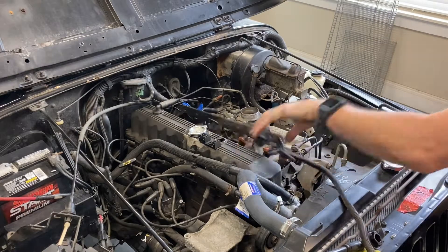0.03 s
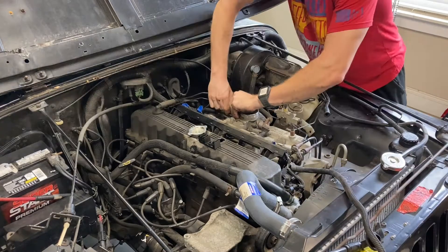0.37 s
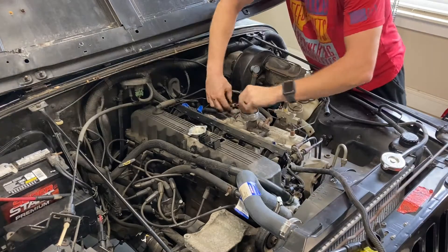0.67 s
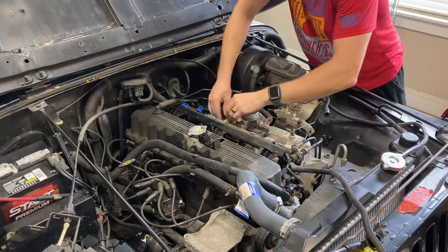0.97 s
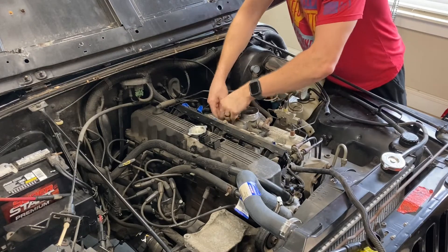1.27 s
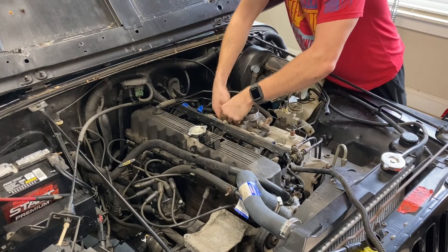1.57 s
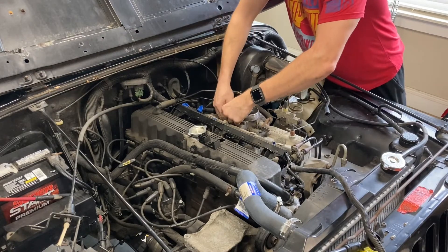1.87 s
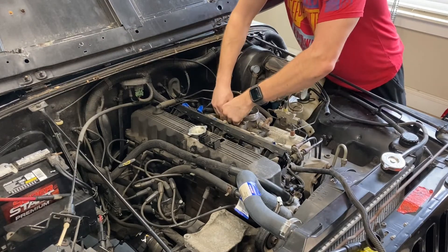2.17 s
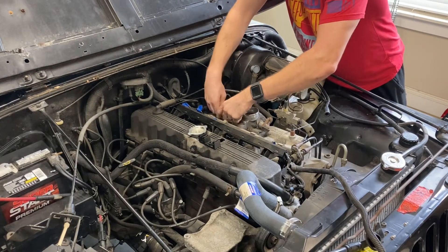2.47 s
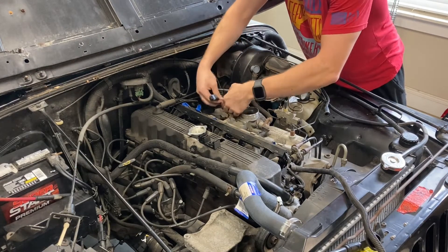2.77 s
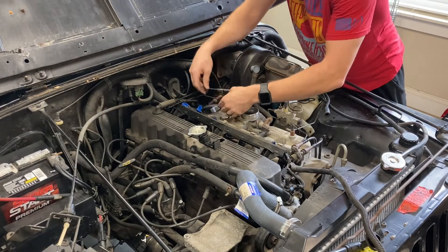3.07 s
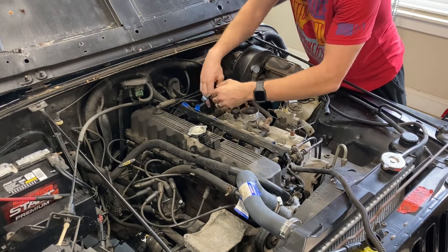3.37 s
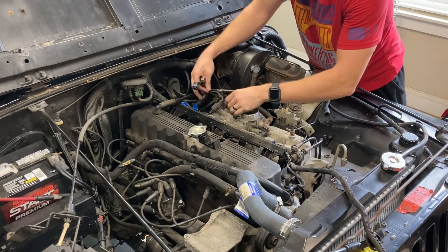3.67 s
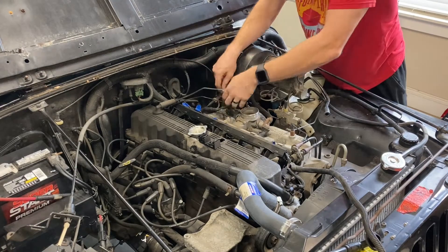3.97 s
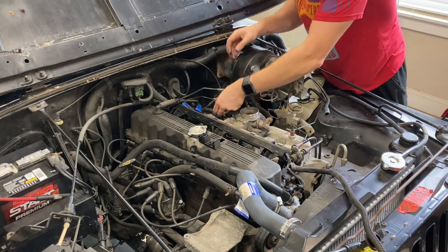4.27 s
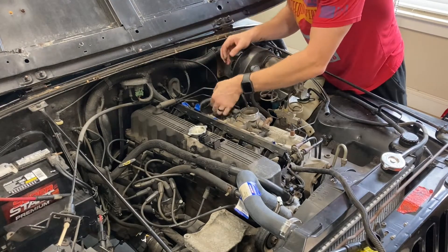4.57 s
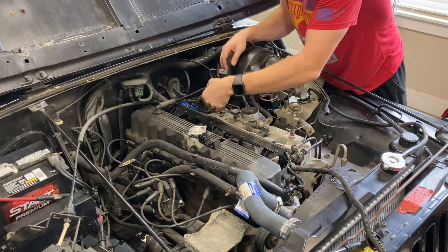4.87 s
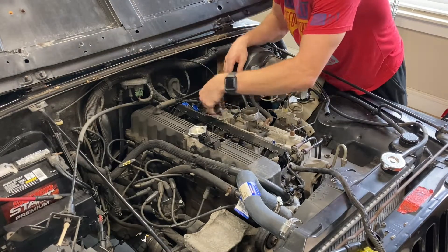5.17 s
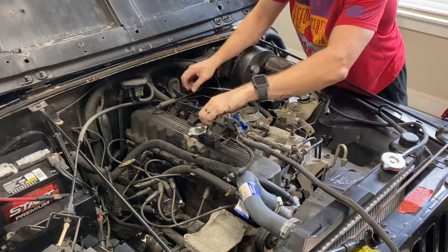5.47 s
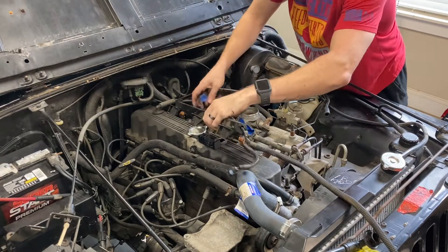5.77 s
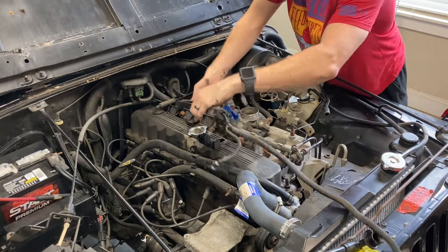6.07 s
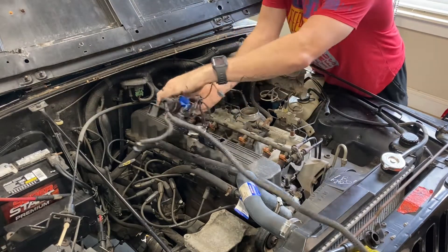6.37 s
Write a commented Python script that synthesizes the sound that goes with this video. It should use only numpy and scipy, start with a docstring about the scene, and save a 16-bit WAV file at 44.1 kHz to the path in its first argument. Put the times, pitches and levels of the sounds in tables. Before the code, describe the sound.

A wiring harness is worked loose in an engine bay inside a garage. Its plastic sheath rustles softly, with a few scrapes and connector clicks at first and a small rattle a little later. In the second half, pulls raise a hollow rumble from the body panels that briefly groans at the hardest tug. It ends with sharp clicks and a ringing knock on metal, heard nearby over a faint room murmur.

```python
"""A plastic sheath rustles and scrapes as a wiring harness is worked loose and dragged across an engine
bay in a garage. Connectors click and now and then strike a metal part, which rings in its own modes.
A hollow rumble, probably the loom rubbing on the body panels, swells with each pull and groans at the
hardest. The air of the garage murmurs underneath, and the whole level dips briefly three times."""
import sys
import numpy as np
from scipy import signal
from scipy.fft import rfft, irfft
from scipy.io import wavfile
from scipy.ndimage import uniform_filter1d

SR = 44100
rng = np.random.default_rng(int(sys.argv[2]) if len(sys.argv) > 2 else 0)


def bounce(signal):
    """Save signal as a 16-bit WAV file at the path given by the first command-line argument."""
    frames = np.transpose(np.atleast_2d(signal))
    limited = np.clip(frames, -1, 1)
    pcm = np.round(limited * 32767).astype(np.int16)
    wavfile.write(sys.argv[1], SR, pcm)


N = 292383
T = np.arange(N) / SR


# broad response of the hollow panels: (frequency [Hz], gain [dB])
PANEL_RESPONSE = [(25, -57), (40, -60), (60, -5.5), (85, -8.5), (120, -4.5), (190, -3), (240, -2.5),
                  (310, -6), (450, -9), (620, -13), (800, -19.5), (1100, -32.5), (2000, -58), (4000, -74)]
# their resonances and one antiresonance: (frequency [Hz], bandwidth [Hz], gain [dB])
PANEL_RESONANCES = [(98, 11.3, 9.5), (127.3, 12, -8.5), (147, 11, 17.5), (187.1, 18, 9), (298.9, 21, 8.5),
                    (377.3, 16.5, 4), (397, 5.8, 2.5), (446, 6, 4), (640, 7.4, 0)]
def panel_rumble():
    """Forced vibration: dense slips of the loom shake the panels; the hardest pulls lock into a groan."""
    low_gain, upper_gain = rubbing()
    groan_from_db, groan_span_db = -29, 3.5
    groan_share = 0.5 * np.clip((20 * np.log10(low_gain) - groan_from_db) / groan_span_db, 0, 1)
    lowpass = signal.butter(4, 350, fs=SR, output="sos")
    mid_side = []
    for _ in range(2):
        body = colour(slips(per_s=2200, spread_db=1.26), PANEL_RESPONSE)
        for hz, width_hz, db in PANEL_RESONANCES:
            body = resonate(body, hz, width_hz, db)
        low = signal.sosfiltfilt(lowpass, body, padtype="even")
        even = low / np.sqrt(uniform_filter1d(low ** 2, size=2600))  # the hand keeps the pull even
        boom = np.sqrt(1 - groan_share) * even + np.sqrt(groan_share) * groan()
        mid_side.append(boom * low_gain + unit(body - low) * upper_gain)
    return stereo(*mid_side, pan_db=3.0)


# pulls on the loom: (start [s], low rumble level [dB], hold [s], upper rumble relative to low [dB])
LOOM_PULLS = [(0.02, -50.5, 0.45, -8.5), (0.628, -46, .01, -15.5), (1.13, -48.5, .01, -12),
              (1.406, -49.5, .05, -14), (3.065, -49, 0.06, -9), (3.538, -52.5, 0.058, -13),
              (3.768, -34.5, 0.12, -14), (3.987, -41.5, 0.035, -11.5), (4.24, -40.5, 0.26, -11.5),
              (4.499, -33.5, 0.041, -20.5), (4.725, -37, 0.17, -15), (5.206, -41.5, 0.018, -8.5),
              (5.364, -35, 0.043, -9), (5.444, -24, 0.092, -14.5), (5.673, -29, 0.021, -9),
              (5.912, -29.5, 0.17, -13), (6.338, -29.5, 0.028, -11.5), (6.53, -37, .1, -3.5)]
def rubbing():
    """Incoherent addition: pulls add in power to the resting contact, giving low and upper band gains."""
    rest_db, rest_upper_db = -54, -9.5
    low_power, upper_power = undb(rest_db) ** 2, undb(rest_db + rest_upper_db) ** 2
    for start, db, hold, upper_db in LOOM_PULLS:
        pull = undb(db) * stroke(start, hold, attack_s=0.049, release_s=0.24)
        low_power += pull ** 2
        upper_power += (pull * undb(upper_db)) ** 2
    return np.sqrt(low_power), np.sqrt(upper_power)


def groan():
    """Stick-slip oscillation locked to the main panel resonance: a wavering note with a weaker octave."""
    pitch_hz = 149.5 * (1 + 0.0319 * walk(60))
    phase = 2 * np.pi * np.cumsum(pitch_hz) / SR
    octave = undb(-6) * np.cos(2 * phase + 0.37 * walk(40))
    return unit((np.sin(phase) + octave) * undb(1.5 * walk(50)))


# connector impacts: (time [s], level [dB], shell resonance [Hz], treble [dB], body [dB],
# relative rattle level [dB], contact time constant [s])
CONNECTOR_CLICKS = [(0.473, -27, 4370, -8.5, 7, -26, 0.0041), (0.497, -41, 5000, -7, 7, -10, .004),
                    (0.520, -37, 3000, -13, 4, -21, 0.0028), (0.772, -29, 3400, -3.5, 1, -13, 0.002),
                    (2.3304, -40.5, 2500, -5, 0, -6, 0.0028), (2.4028, -47, 1720, -24, 2, -5, .004),
                    (2.4345, -46.5, 2700, -11, -2, -5, 0.0036), (2.4613, -44.5, 2750, -6, -5, -11, 0.0059),
                    (4.0764, -44, 1830, -3.5, 13, -13, 0.0078), (4.6983, -37.5, 2700, 6.5, 13, -16, 0.002),
                    (4.712, -40, 2460, -4, 14, -14.5, 0.003), (5.136, -49, 2940, -1, -8, -12, 0.0027),
                    (5.176, -42.5, 2700, 0, -10, -5, 0.0024), (5.204, -24, 2900, -8, -13, -43, 0.0026),
                    (4.511, -46, 2600, -4, 13, -12, .004), (5.689, -47, 4660, 0, 21, -6.5, 0.0038),
                    (6.368, -34.5, 2400, -13, 3, -15, 0.0038), (6.455, -25.5, 4570, -5, -16, -27, 0.0031),
                    (6.465, -29, 3900, -9, -25, -19, 0.0043)]
def connector_clicks():
    """Impact excitation: a short force pulse and a loose rattle drive each connector's shell."""
    sounds, t = [], T[:SR // 3]
    for start, db, hz, treble_db, body_db, rattle_db, contact_s in CONNECTOR_CLICKS:
        rattle = undb(rattle_db + 2.5 * walk(350, size=len(t))) * np.exp(-t / .02)
        force = (np.exp(-t / contact_s) + rattle) * (1 - np.exp(-t / .0009))
        sounds.append((start, undb(db) * plastic(force, hz, treble_db, body_db)))
    return place(sounds)


# scrapes: (time [s], level [dB], decay time [s], shell resonance [Hz], treble [dB], body [dB])
EDGE_SCRAPES = [(0.055, -43.5, 0.031, 2740, -4, 10.5), (0.174, -45.5, 0.034, 2700, -6, 16),
                (0.482, -51, 0.06, 4940, 2.5, 19.5), (0.881, -48, .032, 2930, -7.5, 6),
                (1.575, -58, .03, 2000, -6, 3), (4.359, -54.5, 0.019, 2840, -20, 3),
                (4.505, -57.5, 0.091, 2820, 4, 19.5), (5.245, -50.5, 0.038, 1620, -2, 23),
                (6.178, -45.5, 0.026, 1560, -8, 7), (6.471, -37.5, 0.029, 3320, -10, -31)]
def edge_scrapes():
    """Sliding friction: a brief, uneven force drives the sheath as it passes over an edge."""
    sounds, t = [], T[:SR // 3]
    for start, db, decay_s, hz, treble_db, body_db in EDGE_SCRAPES:
        envelope = (1 - np.exp(-t / .003)) * np.exp(-(t / decay_s) ** 2)
        force = envelope * undb(3 * walk(300, size=len(t)))
        sounds.append((start, undb(db) * plastic(force, hz, treble_db, body_db)))
    return place(sounds)


# broad response of a plastic shell: (frequency [Hz], gain [dB])
SHELL_RESPONSE = [(200, -12), (800, -5.5), (1200, -9), (1700, -2), (2350, -5), (3100, -1.5), (3900, -4),
                  (5500, -7.5), (9000, -8.5), (12000, -8.5), (15500, -7)]
def plastic(force, hz, treble_db, body_db):
    """Source and filter: a resonant shell colours contact noise, bright if hard, full if heavy."""
    noise = colour(rng.standard_normal(len(force)), SHELL_RESPONSE)
    sound = unit(resonate(noise, hz, width_hz=hz / 6, db=6)) * force
    # each point of contact brings out its own small, short-lived resonances
    for centre in np.geomspace(1700, 9000, 9) * np.exp(.04 * rng.standard_normal(9)):
        sound = resonate(sound, centre, width_hz=centre / 22, db=5)
    return colour(undb(-3.5) * sound, [(900, body_db), (1900, 0.041), (3800, 0), (8000, treble_db)])


# modes of each metal part: (frequency [Hz], relative level [dB], time to decay by 60 dB [s])
METAL_MODES = {"rail": [(1343, -12, 0.45), (1670, -3.5, 0.12), (2770, -12, 0.17), (3004, -1, 0.22),
               (3297, -12.5, 0.4), (3550, -13, .2), (4720, -14, 0.19), (5640, -15, 0.18)],
               "clip": [(1650, 3, 0.027), (1720, 11.5, 0.04), (1805, 5, 0.028), (2910, -12, 0.054),
               (4100, -7, 0.056)], "stud": [(2930, 2, 0.055), (3570, -8, 0.17), (3930, -6, .1),
               (6460, -12, .11), (9400, -9, 0.093), (9750, -7, 0.15)], "bolt": [(3140, -2, 0.22),
               (3960, -16, 0.13), (4770, -9, .1)], "cover": [(933, -3, 0.045), (1320, 3, 0.049),
               (1530, 1, 0.065)], "bracket": [(2170, -10, 0.06), (2304, 0, 0.07), (2356, -18.5, 0.28),
               (7280, -18, 0.066)], "pipe": [(1280, -12, 0.043), (3280, -15, 0.18), (3285, -15, 0.2),
               (4200, -1.5, 0.12), (4320, -19, 0.096)]}
def metal_ring(part, t):
    """Modal decay: a struck part rings in damped modes, which flutter as the connector chatters on it."""
    ring = 0
    for hz, db, t60 in METAL_MODES[part]:
        flutter = undb(2.5 * walk(130, size=len(t)))
        phase = 2 * np.pi * hz * t + .5 * walk(160, size=len(t))
        ring += undb(db) * np.exp(-np.log(1000) * t / t60) * flutter * np.sin(phase)
    return ring * (1 - np.exp(-t / 0.0025))


# knocks and rebounds of connectors on metal: (time [s], level [dB], part)
METAL_KNOCKS = [(0.012, -48.5, "pipe"), (.178, -41.5, "rail"), (.521, -46, "cover"), (.774, -43, "stud"),
                (0.882, -52, "bolt"), (0.917, -55, "bolt"), (2.332, -51, "clip"), (2.404, -61, "clip"),
                (2.44, -52.5, "clip"), (2.463, -52.5, "clip"), (2.486, -56, "clip"), (5.183, -62, "rail"),
                (5.244, -45.5, "cover"), (6.175, -39, "rail"), (6.454, -23, "bracket"),
                (6.467, -26, "pipe"), (6.495, -34.5, "pipe"), (6.532, -49, "pipe")]
def metal_knocks():
    """Free vibration: each part rings on after a connector meets it."""
    t = T[:SR // 3]
    return place([(start, undb(db) * metal_ring(part, t)) for start, db, part in METAL_KNOCKS])


# spectrum of the rustle: (frequency [Hz], relative level [dB])
SHEATH_SPECTRUM = [(400, 1), (1000, 0), (1800, 5.5), (3000, 1.5), (5000, 2.5), (8500, 3.5), (12000, -5.5),
                   (15500, -1)]
# long slides through the hands: (start [s], level [dB], hold [s])
SHEATH_SLIDES = [(-.06, -54.5, .2), (5.2, -56.5, .8), (6.034, -54.5, .6)]
def sheath_rustle():
    """Friction noise: ribbed plastic crackles finely as it slips through the fingers."""
    fingering_db = -62 - .5 * T  # light, slowly fading rustle between the slides
    power = undb(fingering_db) ** 2
    for start, db, hold in SHEATH_SLIDES:
        power += (undb(db) * stroke(start, hold, attack_s=0.077, release_s=0.083)) ** 2
    gain = np.sqrt(power) * undb(0.88 * walk(16))
    mid, side = (unit(colour(slips(per_s=7000, spread_db=1.0), SHEATH_SPECTRUM)) for _ in range(2))
    return stereo(mid * gain, side * gain, pan_db=-0.7)


def garage_reverb(x, wet_db, scatter):
    """Reverberation: engine parts scatter sound at once; bonnet and walls return a diffuse tail."""
    t, t60_s = T[:SR // 2], 0.26
    decay = np.exp(-np.log(1000) * t / t60_s) * (t > .004) + scatter * np.exp(-t / .003)
    tails = rng.standard_normal((2, len(t))) * decay  # one for each ear
    wet = np.array([signal.fftconvolve(x, tail / np.linalg.norm(tail))[:N] for tail in tails])
    return x * undb([[1], [1.8]]) + undb(wet_db) * wet  # the hands work a little to the right


# spectrum of the still garage air: (frequency [Hz], relative level [dB])
AIR_SPECTRUM = [(18, -60), (30, -59), (46, -15), (75, -26.5), (95, -1), (152, -1), (209, -19.5), (271, 0),
                (335, -15.5), (382, -8.5), (1310, -22), (1790, -24), (2210, -26), (6830, -30.5),
                (15800, -39)]
def garage_air():
    """Stationary noise: the low murmur of the building under a smooth hiss."""
    mid, side = (unit(colour(rng.standard_normal(N), AIR_SPECTRUM)) for _ in range(2))
    return undb(-51.5) * stereo(mid, side, pan_db=0)


# stereo width: (frequency [Hz], gain of the side signal [dB])
SIDE_RESPONSE = [(30, -23), (70, -18), (250, -18), (500, -11), (1000, -2), (2000, 2), (5000, 1.5),
                 (9000, -2), (13000, 3)]
def stereo(mid, side, pan_db):
    """Interaural coherence: bass reaches both ears alike, treble arrives from all sides."""
    side = colour(side, SIDE_RESPONSE)
    return np.array([mid + side, mid - side]) * undb([[pan_db / 2], [-pan_db / 2]])


def slips(per_s, spread_db):
    """Poisson process: tiny stick-slip releases at random moments, a few larger than the rest."""
    impulses = (rng.random(N) < per_s / SR) * rng.choice([-1, 1], N)
    return impulses * undb(spread_db * rng.exponential(size=N))


def stroke(start, hold, attack_s, release_s):
    """Amplitude envelope of a hand movement: linear rise, hold and exponential decay."""
    since = T - start
    return np.clip(since / attack_s, 0, 1) * np.exp(-np.maximum(since - attack_s - hold, 0) / release_s)


def colour(x, points):
    """Minimum-phase filtering through points of (frequency [Hz], gain [dB])."""
    hz, db = np.transpose(points)
    size = 8192
    bin_hz = np.arange(size // 2 + 1) * SR / size
    log_gain = np.log(undb(np.interp(np.log(bin_hz + 1), np.log(hz), db)))
    fold = 1 + np.sign(size / 2 - np.arange(size))  # folding the cepstrum makes the filter causal
    fold[0] = 1
    cepstrum = irfft(log_gain) * fold
    response = irfft(np.exp(rfft(cepstrum)))
    return signal.fftconvolve(x, response)[:len(x)]


def resonate(x, hz, width_hz, db):
    """Second-order resonance: lifts or hollows out a narrow band."""
    return x + (undb(db) - 1) * signal.lfilter(*signal.iirpeak(hz, hz / width_hz, fs=SR), x)


def walk(rate_hz, size=N):
    """Random modulation: smoothed steps with a spread near 1."""
    step = int(SR / rate_hz)
    held = np.repeat(rng.standard_normal(size // step + 1), step)
    return 1.3 * uniform_filter1d(uniform_filter1d(held, step), step)[:size]


def place(sounds):
    """Superposition of (time [s], sound) pairs on one track."""
    track = np.zeros(N + SR)
    for start, sound in sounds:
        first = int(start * SR)
        track[first:first + len(sound)] += sound
    return track[:N]


def undb(db):
    """Amplitude ratio of a level in decibels."""
    return 10 ** (np.asarray(db) / 20)


def unit(x):
    """Normalisation to an rms of 1."""
    return x / np.sqrt(np.mean(x ** 2))


# brief dips of the whole level: (time [s], time constant [s], depth [dB])
LEVEL_DIPS = [(0.325, 0.0094, 29.5), (3.792, 0.015, 19.5), (5.224, 0.0068, 34.5)]
def scene():
    """Superposition: all sources add, and their sum sinks for a moment at each dip."""
    contacts = garage_reverb(connector_clicks() + edge_scrapes(), wet_db=0, scatter=2.2)
    rings = garage_reverb(metal_knocks(), wet_db=-10, scatter=0)
    dip_db = sum(depth * np.exp(-np.abs(T - time) / tau) for time, tau, depth in LEVEL_DIPS)
    return (panel_rumble() + sheath_rustle() + contacts + rings + garage_air()) * undb(-dip_db)


def record(dry):
    """Band limiting: a steep low-pass filter removes the highest treble."""
    cutoff_hz = 15800
    return signal.sosfilt(signal.ellip(10, .2, 80, cutoff_hz, fs=SR, output="sos"), dry)


dry = scene()
out = record(dry)
bounce(out)
```